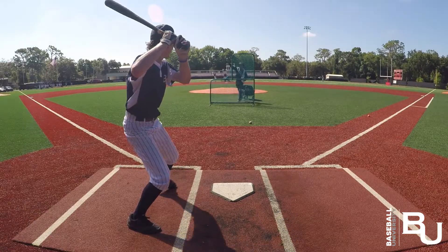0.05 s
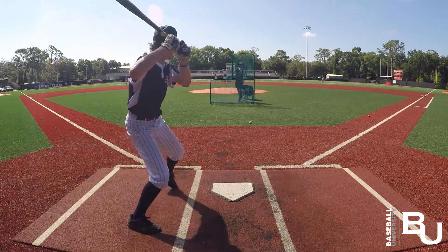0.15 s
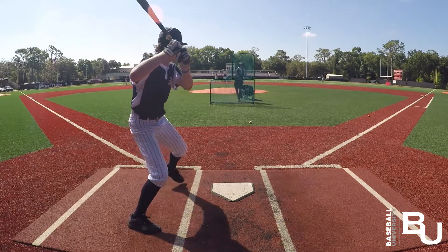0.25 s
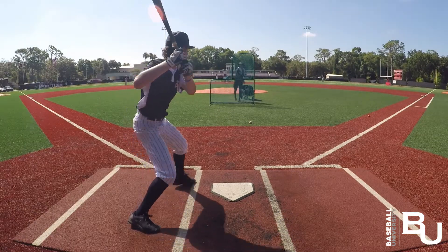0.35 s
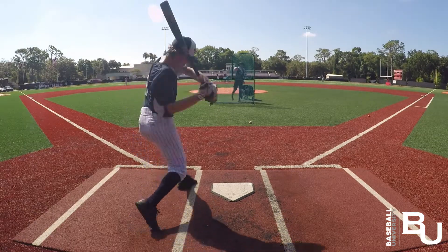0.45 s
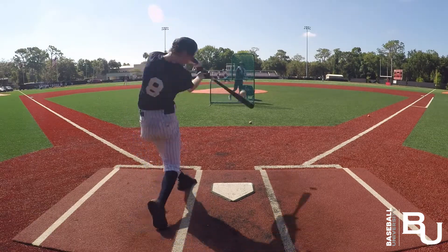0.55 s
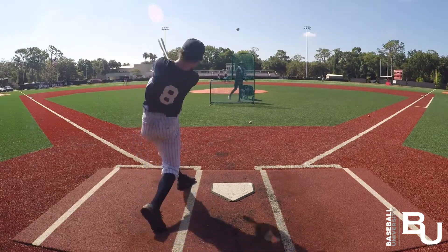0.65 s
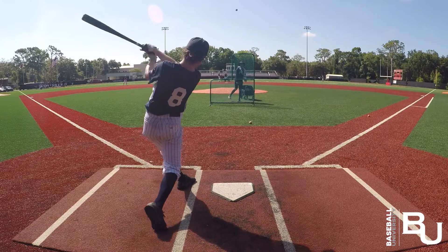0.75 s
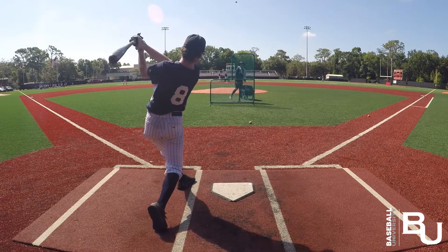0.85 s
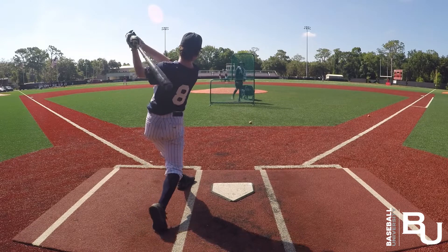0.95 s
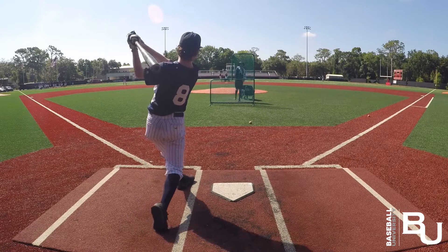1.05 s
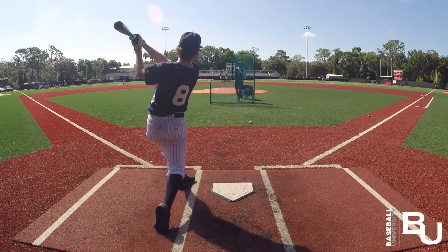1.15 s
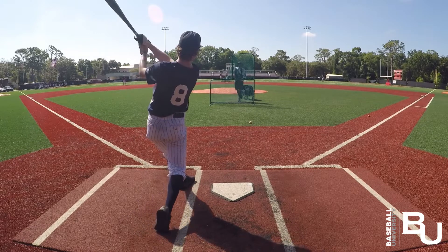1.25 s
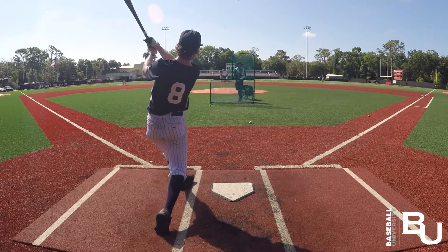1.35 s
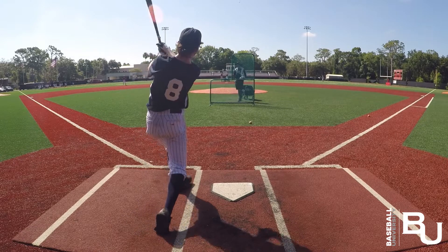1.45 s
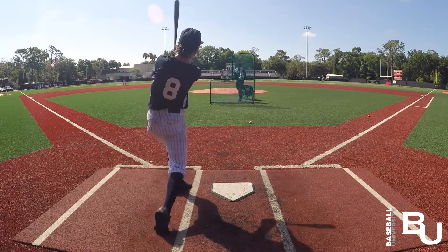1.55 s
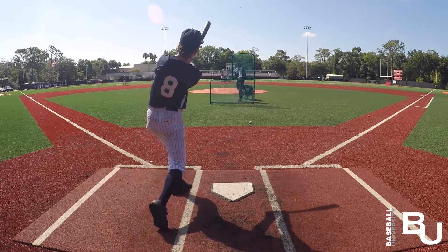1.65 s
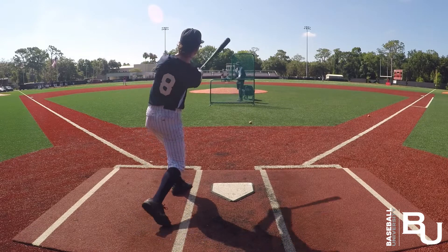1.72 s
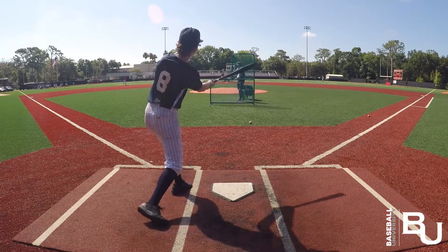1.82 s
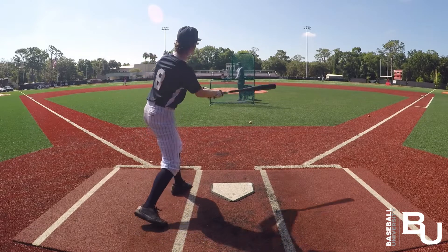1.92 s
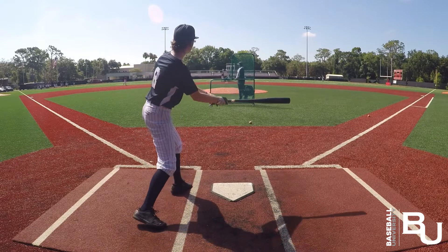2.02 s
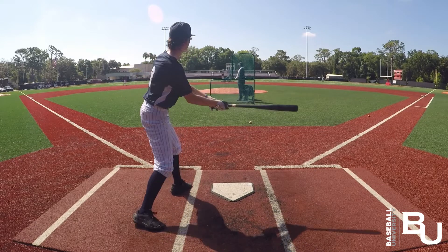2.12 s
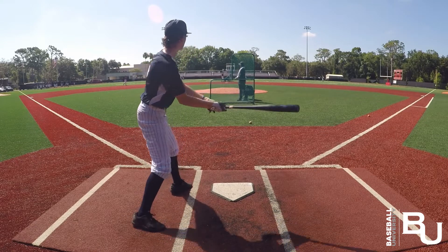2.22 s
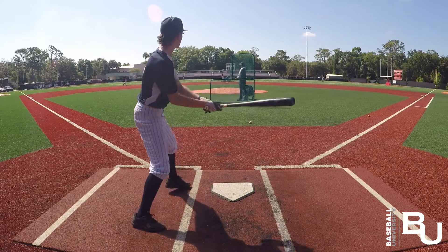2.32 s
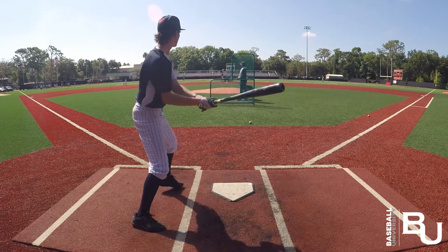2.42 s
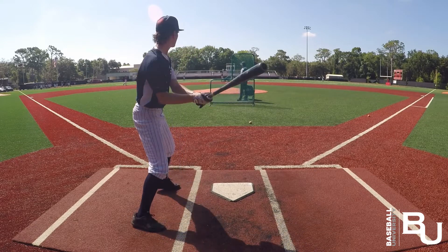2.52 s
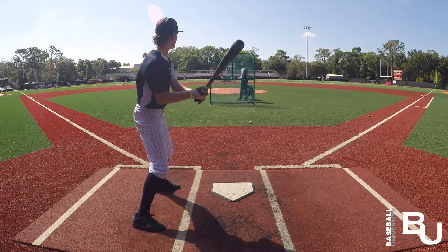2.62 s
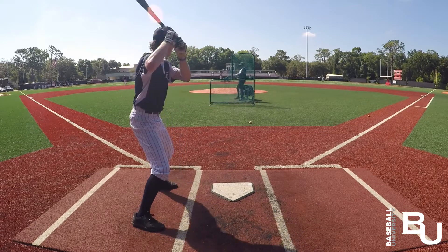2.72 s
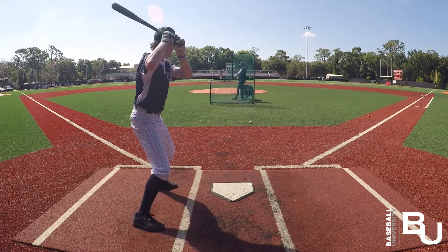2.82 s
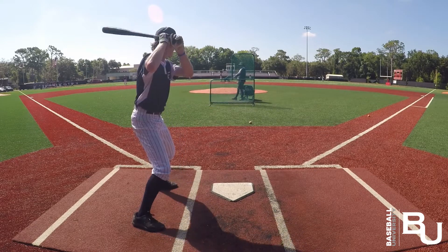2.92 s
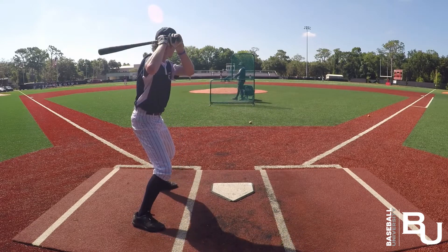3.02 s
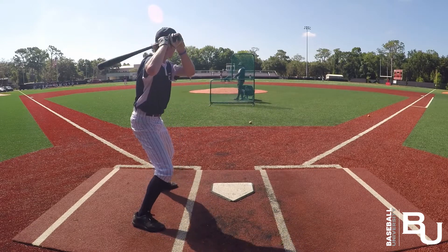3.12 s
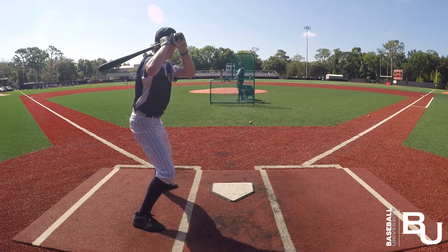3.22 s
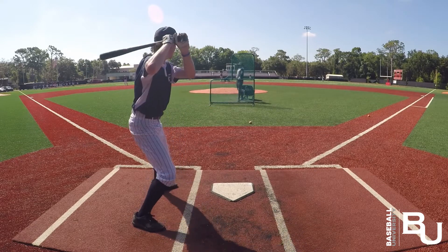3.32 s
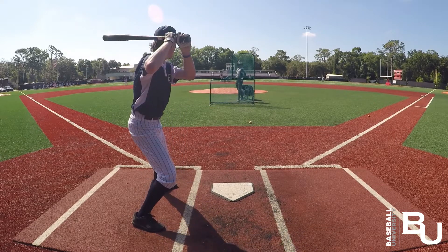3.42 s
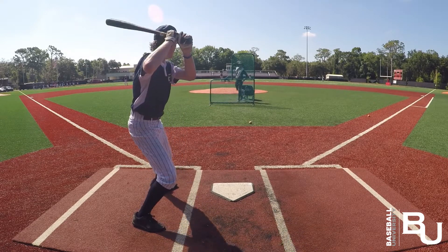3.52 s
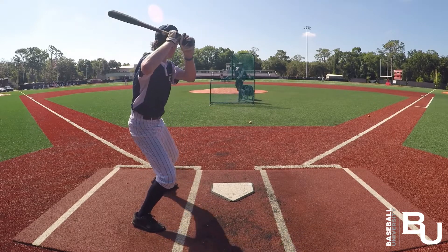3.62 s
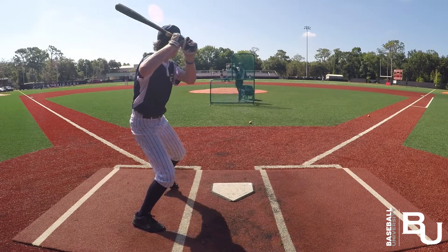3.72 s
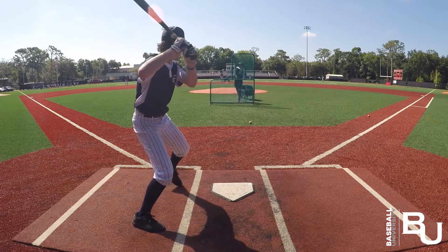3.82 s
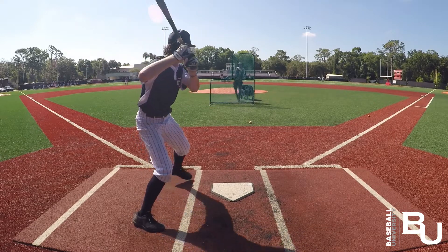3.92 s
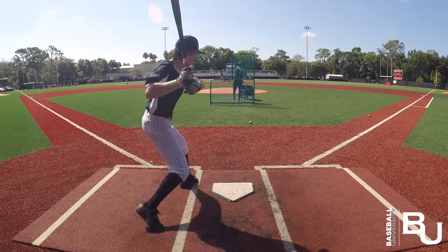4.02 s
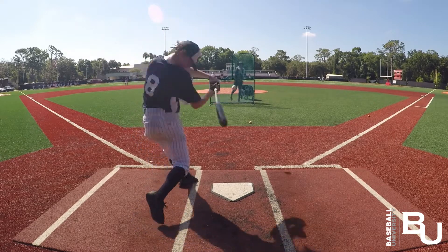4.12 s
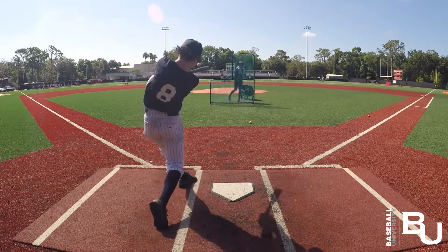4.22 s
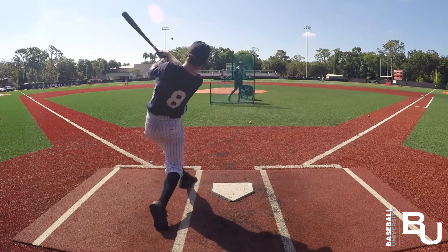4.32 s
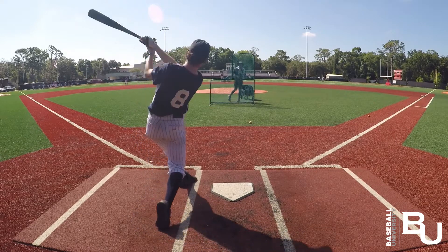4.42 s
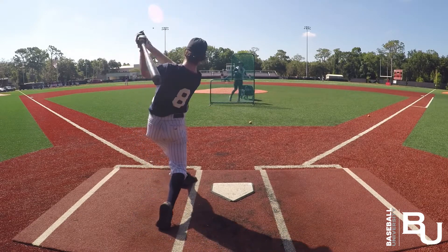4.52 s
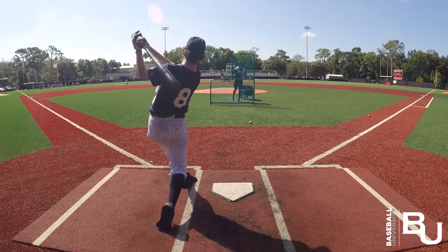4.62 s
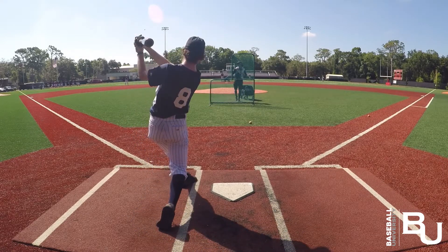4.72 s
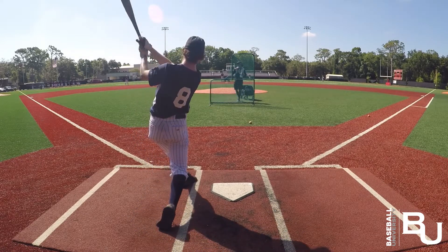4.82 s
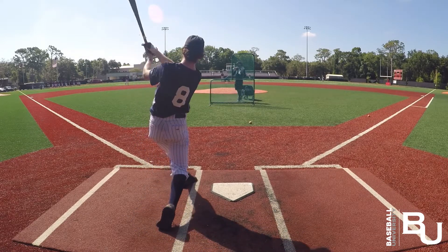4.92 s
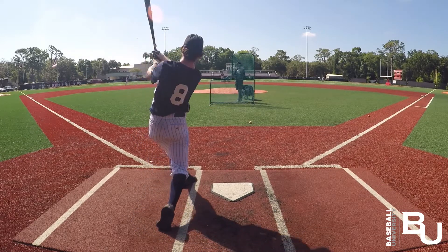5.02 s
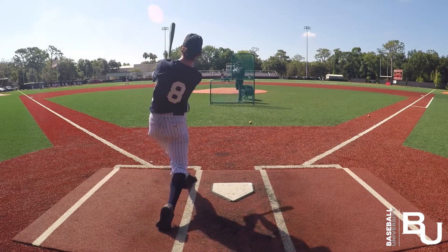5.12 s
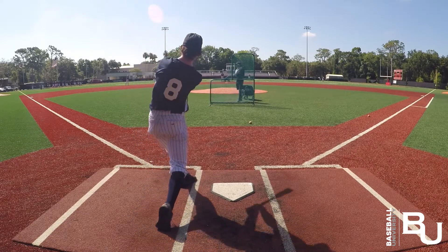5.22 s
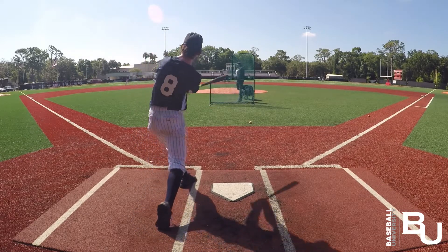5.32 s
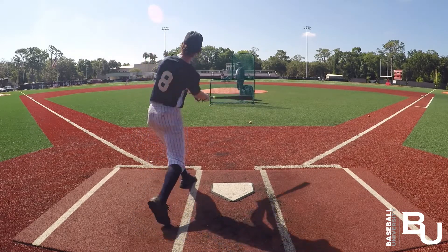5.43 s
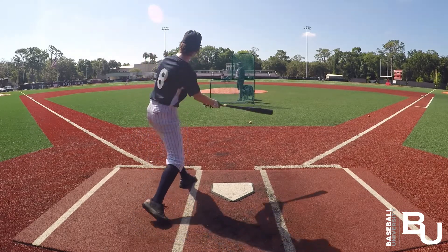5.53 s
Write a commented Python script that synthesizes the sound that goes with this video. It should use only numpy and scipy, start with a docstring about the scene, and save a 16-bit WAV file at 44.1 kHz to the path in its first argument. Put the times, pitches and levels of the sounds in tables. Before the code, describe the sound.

On an open ball field, a baseball bat cracks against a ball close to the microphone, loud and slightly overloaded, with a brief ring and quick echoes off the fences. A quiet stretch follows, with low outdoor rumble, a faint far whine and a few distant birds. A few seconds later a second, sharper hit echoes away. A soft shoe scuff comes just before each hit.

```python
"""Batting practice on an open ball field, the camera's microphone close to the batter.
A low outdoor rumble, a faint far whine and a few distant birds are there from the start.
The batter's shoe scuffs the turf as he strides, and at 0.6 s the bat cracks against the ball, near
enough to overload the input; cage, fences and stands throw the crack back. His kit ticks, something
knocks far off, and at 4.2 s he hits a second pitch. The field then settles back to rumble and birds."""
import sys
import numpy as np
from scipy.fft import rfft, irfft, next_fast_len
from scipy.io import wavfile
from scipy.ndimage import map_coordinates

SR = 44100
rng = np.random.default_rng(int(sys.argv[2]) if len(sys.argv) > 2 else 0)


def wav_out(sig):
    """Save sig, one row per channel (or a flat mono array), as 16-bit PCM at SR to the path in sys.argv[1]."""
    wavfile.write(sys.argv[1], SR, np.round(np.clip(np.atleast_2d(sig).T, -1, 1) * 32767).astype(np.int16))


N = 245195
TIME = np.arange(N) / SR

# Bat meets ball. Each row: start in seconds, ring gain in dB, crack level in dB, crack pitch in Hz,
# crack length in seconds, thump level in dB, off-centre tilt in dB per octave, wash gain in dB,
# cage echo gain in dB.
HITS = [(0.6172, 4.5, -6.5, 2002, 0.0015, -27.5, 1.5, 3, -28),
        (4.2370, 6, 4, 3472, 0.00092, -21, 2.5, 1.8, -22)]
# Colour of a shoe on turf, lent to the other rubs and the whoosh. Each row: frequency in Hz, gain in dB.
RUB_COLOUR = [(300, -20.5), (800, -7.5), (1120, 0.5), (1400, -7), (1700, -3), (2000, -6), (2450, 3),
              (3000, -10), (3800, 2.5), (4600, -10), (7000, -13.5), (14000, -23)]


def amp(db):
    """Decibels to amplitude."""
    return 10 ** (np.asarray(db) / 20)


def unit(x):
    """x scaled to rms 1."""
    return x / np.sqrt(np.mean(x ** 2) + 1e-20)


def along(points, hz):
    """Read (Hz, value) points at hz, on a log frequency axis."""
    freqs, values = np.transpose(points)
    return np.interp(np.log(hz + 1), np.log(freqs + 1), values)


def wobble(rate):
    """A smooth random curve, rate knots a second."""
    return map_coordinates(rng.standard_normal(int(N * rate / SR) + 4), [TIME * rate])


def filtered(x, response):
    """x through a filter whose gain is response(hz)."""
    size = next_fast_len(N + 8192)
    return irfft(rfft(x, size) * response(np.fft.rfftfreq(size, 1 / SR)), size)[:N]


def noise(colour_db):
    """Noise of rms 1 with the spectral shape colour_db(hz)."""
    return unit(filtered(rng.standard_normal(N), lambda hz: amp(colour_db(hz))))


def add(out, s, x):
    """Mix x into out from second s on."""
    part = out[round(s * SR):][:len(x)]
    part += x[:len(part)]


def rubs(events, focus_db=3, grit_db=3.0):
    """Gritty noise bursts. Each event: centre in seconds, level in dB, width in seconds, pitch in Hz."""
    out = np.zeros(N)
    for s, db, width, pitch in events:
        rub = noise(lambda hz: along(RUB_COLOUR, hz) - focus_db * np.log2((hz + 1) / pitch) ** 2)
        out += amp(db) * np.exp(-.5 * ((TIME - s) / width) ** 2) * rub
    return out * unit(amp(grit_db * wobble(500)))


def camera_ticks(tick_hz=8550, tick_db=-76, frame_hz=29.97):
    """Right at the microphone, the camera's electronics chirp faintly once a frame."""
    gate = np.cos(np.pi * frame_hz * (TIME - .005)) ** 8
    return amp(tick_db) * gate * noise(lambda hz: -20 * np.log10(1 + ((hz - tick_hz) / 120) ** 2))


def outdoor_air(level_db=-54, gust_db=0.6):
    """All around the field, a rumble that heaves with the breeze and a smooth hiss of trees."""
    # Colour of the open air. Each row: frequency in Hz, relative noise density in dB.
    air_colour = [(10, -11.5), (22, 0), (38, -1), (65, -3), (105, -11), (230, -17), (450, -23.5),
                  (750, -26.5), (1120, -26), (2000, -29), (2550, -30), (3000, -32), (3760, -31),
                  (4600, -34), (15000, -45.5)]
    air = amp(level_db) * noise(lambda hz: along(air_colour, hz))
    rumble = filtered(air, lambda hz: 1 / (1 + (hz / 200) ** 2))
    hiss = air - rumble
    return hiss + rumble * amp(gust_db * wobble(2))


def far_whine(pitch_hz=1324, octave_db=-14, flutter_db=1.26, half_width_s=.1):
    """Far off, a fluttering tone and its weaker octave come and go in swells."""
    # Swells of the whine. Each row: peak time in seconds, level in dB.
    swells = [(.1, -69), (.87, -68.5), (1.31, -66.5), (2.05, -66), (2.25, -69), (2.69, -73)]
    phase = 2 * np.pi * np.cumsum(pitch_hz + 5 * wobble(22)) / SR
    tone = np.sqrt(2) * (np.sin(phase) + amp(octave_db + 3 * wobble(10)) * np.sin(2 * phase))
    level = np.max([amp(db) / (1 + ((TIME - s) / half_width_s) ** 2) for s, db in swells], axis=0)
    return level * amp(flutter_db * wobble(25)) * tone


def birds(arch=1.08, waver=0.01, flutter_db=4.0):
    """Distant slurred whistles: each glides along an arch that levels off at its highest pitch."""
    # Each row: start in seconds, length in seconds, level in dB, middle pitch in Hz, glide in octaves.
    whistles = [(.28, .06, -64.5, 2710, .04), (0.808, .14, -69.5, 7000, .21),
                (3.26, 0.065, -69, 2570, -0.13), (3.665, .022, -67.5, 2650, -.14),
                (3.737, .075, -66.5, 2770, -0.28), (3.905, 0.092, -61.5, 2300, .025),
                (5.42, 0.082, -63, 2710, -.33)]
    out, drift, flutter = np.zeros(N), wobble(150), wobble(45)
    for s, length, db, pitch, glide in whistles:
        u = np.linspace(-.5, .5, int(length * SR))  # position about the whistle's middle
        here = round(s * SR) + np.arange(len(u))
        octaves = glide * u - arch * abs(glide) * u ** 2
        hz = pitch * 2 ** octaves * (1 + waver * drift.take(here, mode="clip"))
        level = amp(db + flutter_db * flutter.take(here, mode="clip"))
        fade = np.sqrt(np.abs(np.cos(np.pi * u)))
        add(out, s, level * fade * np.sin(2 * np.pi * np.cumsum(hz) / SR))
    return out


def far_knocks(width_s=.012, pitch_hz=650):
    """Dull knocks, a long way from the microphone."""
    # Each row: time in seconds, level in dB.
    knocks = [(1.863, -60.5), (4.822, -59.5)]
    return rubs([(s, db, width_s, pitch_hz) for s, db in knocks])


def kit_ticks(width_s=0.0018):
    """Close by, the batter's kit gives small ticks."""
    # Each row: time in seconds, level in dB, pitch in Hz.
    ticks = [(.579, -53, 2000), (1.962, -61, 3800), (2.951, -62, 4000), (5.338, -62, 6500)]
    return rubs([(s, db, width_s, pitch) for s, db, pitch in ticks])


def stride(pitch_hz=2300):
    """The batter's front shoe scuffs the turf as it lands before every hit."""
    # Toe, then heel. Each row: lead on the hit in seconds, level in dB, width in seconds.
    footfalls = [(0.1745, -56, .012), (.112, -58.5, 0.0215)]
    return rubs([(s - lead, db, width, pitch_hz) for s, *_ in HITS for lead, db, width in footfalls])


def swing(whoosh_db=-57, rise_s=0.026, wake_db=-48.0, wake_s=.055, wake_hz=46):
    """The barrel's rush of air peaks at contact; its wake then buffets the microphone."""
    swell = sum(np.exp(-np.abs(TIME - s) / rise_s) for s, *_ in HITS)
    wake_ages = [np.maximum(TIME - s, 0) / wake_s for s, *_ in HITS]
    buffet = sum(np.sqrt(age * np.exp(1 - age)) for age in wake_ages)
    whoosh = amp(whoosh_db) * swell * noise(lambda hz: along(RUB_COLOUR, hz))
    wake = amp(wake_db) * buffet * noise(lambda hz: -12 * np.log2((hz + 1) / wake_hz) ** 2)
    return whoosh + wake


def cage_echo(cracks, delay_s=.0122):
    """The nearby cage frame mirrors each crack once."""
    out = np.zeros(N)
    for s, *_, cage_db in HITS:
        add(out, s + delay_s, amp(cage_db) * cracks[round(s * SR):][:SR])
    return out


def field_echoes(onset_s=0.0066, loss_db_per_doubling=6.5, near_s=0.22, linger_hz=2485):
    """Rough surfaces scatter each crack in a thinning wash, out of which the large walls stand."""
    # Colour of the scattered crack. Each row: frequency in Hz, gain in dB.
    scatter = [(200, -34), (720, -22), (930, -10), (1110, -2), (1250, -11.5), (1480, -8), (1670, 1.5),
               (1900, -9.5), (2280, -8), (2490, 0.5), (2850, -11), (3500, -6), (5000, -24.5), (6800, -29),
               (9000, -42.5), (15000, -60)]
    # Fences and stands. Each row: delay in seconds, level over the wash in dB, spread in seconds.
    walls = [(.024, 0, 0.0032), (.052, 5.5, .0035), (.094, 1, .004), (.131, 9, 0.0097), (.19, 2.5, .017),
             (.25, 6.5, 0.005)]
    out, t = np.zeros(N), np.arange(SR) / SR
    doublings = np.log2(np.maximum(t / onset_s, 1))
    wash = amp(-26 - loss_db_per_doubling * doublings) * np.minimum(t / onset_s, 1) ** 2 * (1 - t)
    wall_power = sum(amp(db) ** 2 * np.exp(-.5 * ((t - delay) / spread) ** 2)
                     for delay, db, spread in walls)
    near_share = np.exp(-t / near_s)
    # on the longer paths the barrel's main note stands out and the treble is lost
    late_db = lambda hz: 5 / (1 + ((hz - linger_hz) / 70) ** 2) - 4.5 * hz / 5000
    for s, *_, wash_db, _ in HITS:
        paths = rng.standard_normal(N) * amp(2.0 * wobble(500) + 0.6 * wobble(70))  # lumps and flutter
        near = unit(filtered(paths, lambda hz: amp(along(scatter, hz))))[:SR]
        far = unit(filtered(paths, lambda hz: amp(along(scatter, hz) + late_db(hz))))[:SR]
        blend = near_share * near + (1 - near_share) * far
        add(out, s, amp(wash_db) * wash * np.sqrt(1 + wall_power) * blend)
    return out


def bat(build_s=0.0019, barrel_hz=2465, thump_hz=360, thump_t60=0.0085, snap_db=-32, snap_t60=0.0075):
    """Close up, the ball's short contact gives a crack and a push of air, and the barrel rings briefly."""
    # The bat's modes. Each row: frequency in Hz, relative level in dB, seconds to fall by 60 dB.
    modes = [(967, -21, .0133), (1137, -21.5, .052), (1345, -25.5, 0.025), (1646, -2, .0111),
             (2098, -13, .0256), (2458, 6.5, 0.013), (2830, -24, .026), (3065, -13, 0.023),
             (3500, -9, .0135), (3940, -12, 0.014), (4800, -15, .013), (6750, -24, 0.00914)]
    out, t = np.zeros(N), np.arange(SR // 8) / SR
    for s, ring_db, crack_db, crack_hz, crack_s, thump_db, off_centre, *_ in HITS:
        ring = np.zeros(len(t))
        for k, (hz, db, t60) in enumerate(modes):
            # an off-centre blow feeds the modes far from the barrel's main note
            level = amp(db + off_centre * abs(np.log2(hz / barrel_hz)) - 60 * t / t60)
            ring += (-1) ** k * level * np.sin(2 * np.pi * hz * t)  # neighbours move in opposite senses
        ring *= 1 - np.exp(-(t / build_s) ** 2)
        age = t / crack_s
        crack = age ** 3 * np.exp(3 * (1 - age)) * np.sin(2 * np.pi * crack_hz * t)
        thump = amp(-60 * t / thump_t60) * np.sin(2 * np.pi * thump_hz * t)
        snap = amp(snap_db - 60 * t / snap_t60) * rng.standard_normal(len(t))  # leather slaps the barrel
        add(out, s, amp(ring_db) * ring + amp(crack_db) * crack + amp(thump_db) * thump + snap)
    return out


def scene():
    """The close batter, his echoes and the field behind him, on one microphone."""
    cracks = bat()
    echoes = cage_echo(cracks) + field_echoes()
    batter = swing() + stride() + kit_ticks()
    background = far_knocks() + birds() + outdoor_air() + far_whine() + camera_ticks()
    return (background + batter + echoes + cracks)[None]


def record(dry, ceiling=.96, knee=5.5, top_hz=15500):
    """The cracks overload the input, which flattens their peaks; a steep band limit cuts the top."""
    flattened = dry[0] / (1 + np.abs(dry[0] / ceiling) ** knee) ** (1 / knee)
    return filtered(flattened, lambda hz: 1 / np.sqrt(1 + (hz / top_hz) ** 160))[None]


dry = scene()
out = record(dry)
wav_out(out)
```